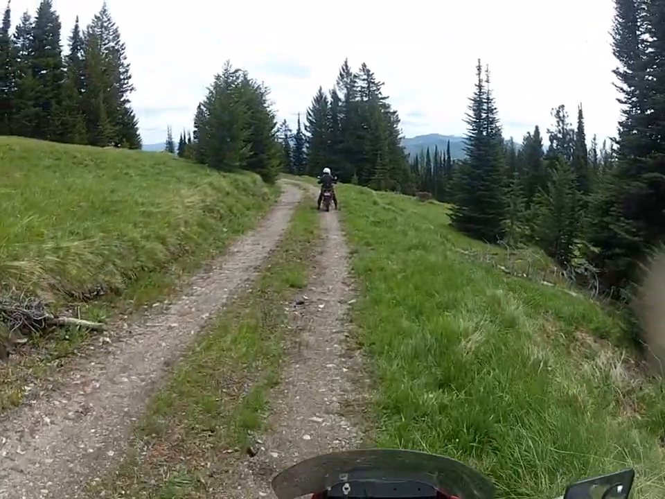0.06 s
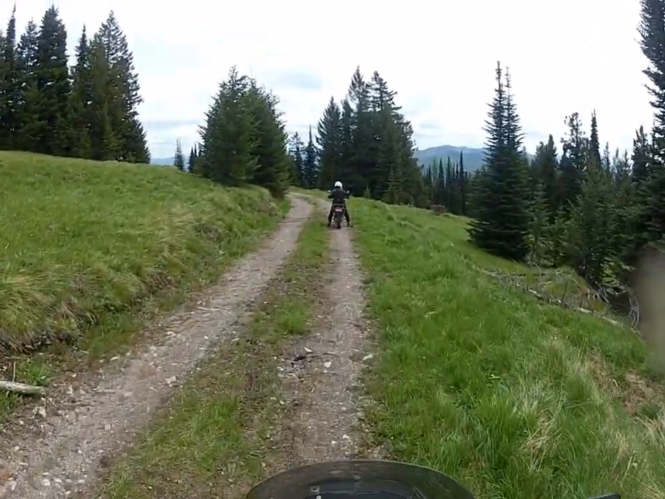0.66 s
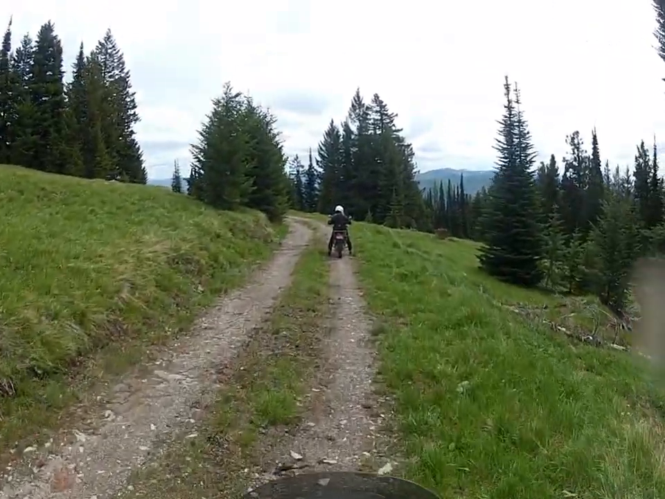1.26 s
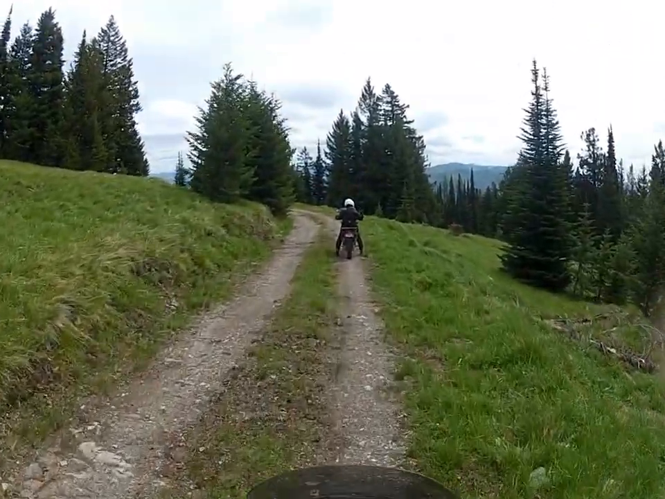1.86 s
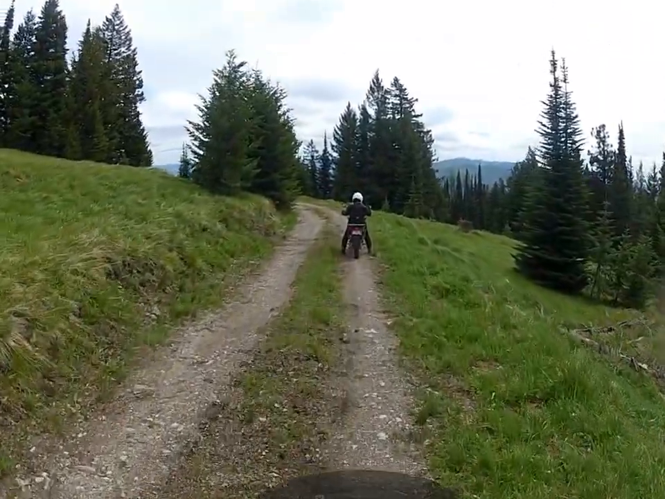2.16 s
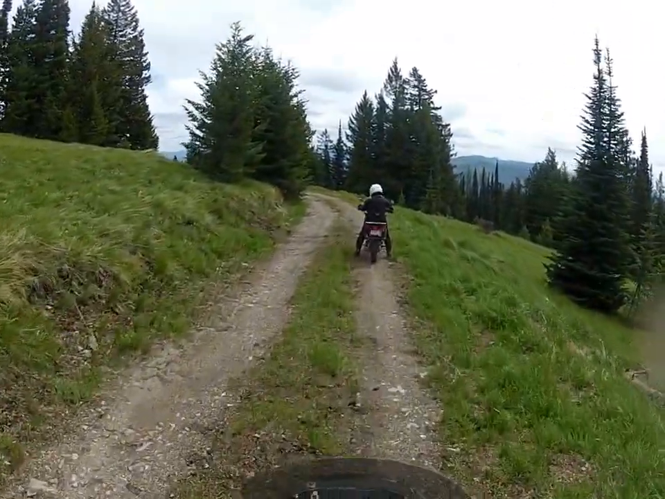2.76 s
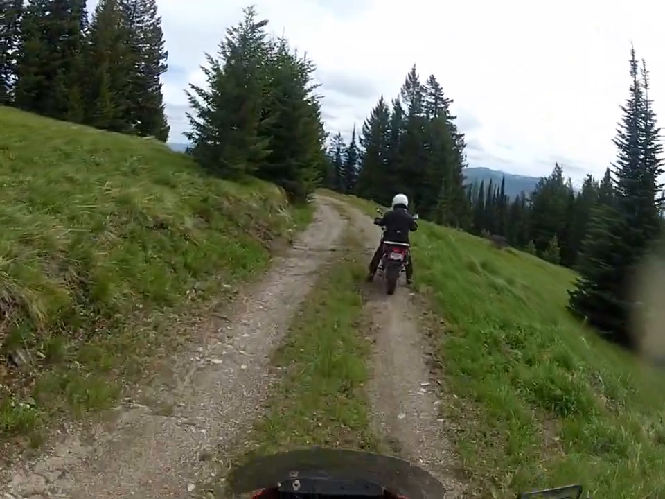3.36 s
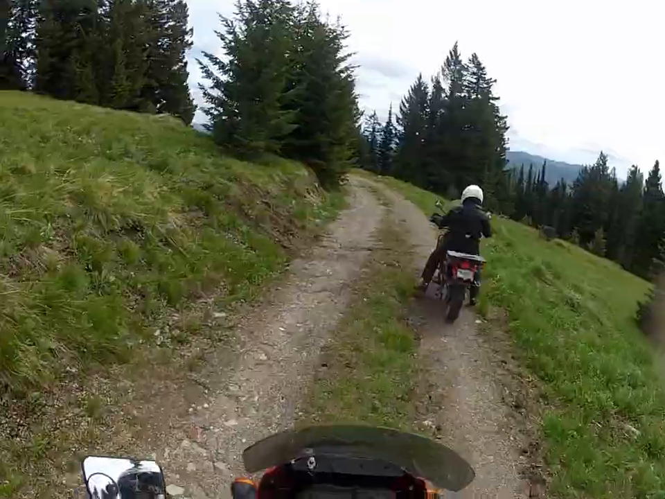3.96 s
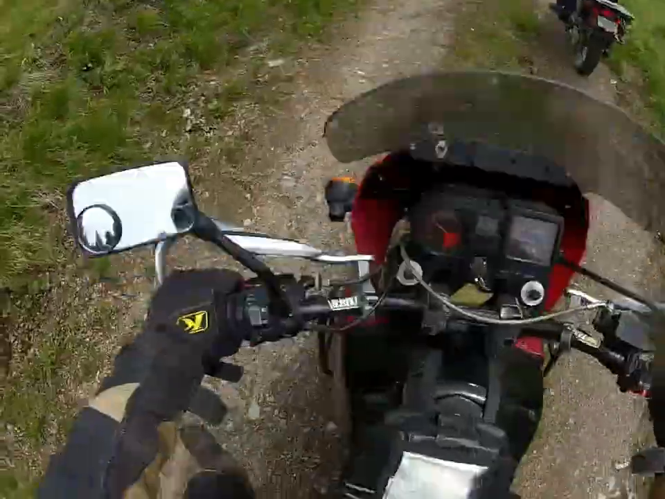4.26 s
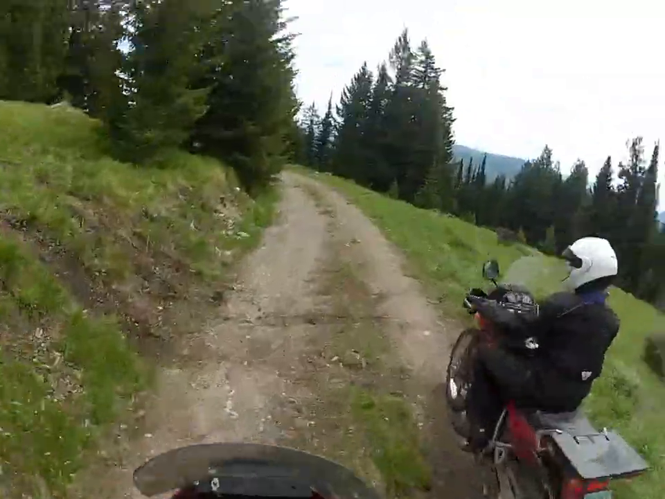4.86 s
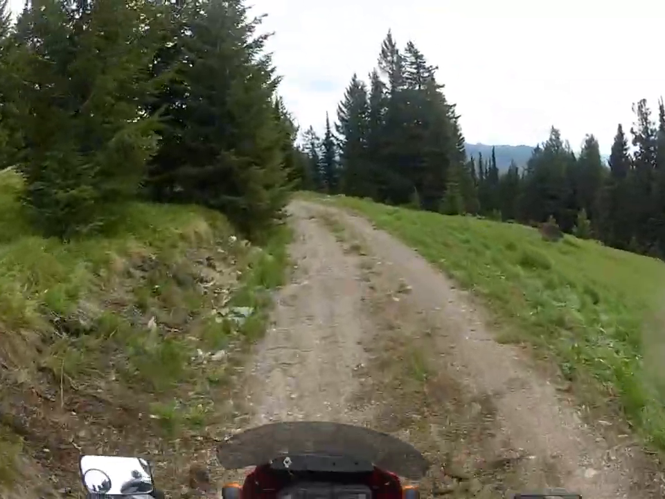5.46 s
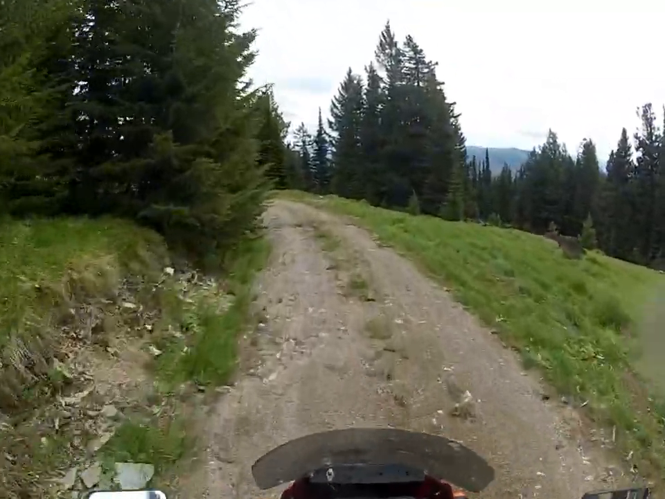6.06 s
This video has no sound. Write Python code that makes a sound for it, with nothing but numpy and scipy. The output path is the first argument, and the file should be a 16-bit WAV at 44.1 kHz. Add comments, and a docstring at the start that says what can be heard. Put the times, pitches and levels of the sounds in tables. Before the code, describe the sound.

A motorcycle thuds along slowly on gravel, with a sharp double knock on the microphone before the engine pulls harder.

```python
"""A gravel forest track, heard from a camera on a motorcyclist's helmet. The single-cylinder bike
rolls at idle, misfires once, then pulls away past a waiting one. Each firing is a low thud over
the engine's clatter; wind rumbles and stones tick under the tyres. As the rider looks down,
something knocks on the camera's shell and snaps back. The camera holds each sample, adding a thin fizz."""
import sys
import numpy as np
from scipy import signal
from scipy.fft import rfft, irfft
from scipy.io import wavfile
from scipy.ndimage import uniform_filter1d

SR = 44100
rng = np.random.default_rng(int(sys.argv[2]) if len(sys.argv) > 2 else 0)


def wav_out(sig):
    """Save sig, one row per channel (or a flat mono array), as 16-bit PCM at SR to the path in sys.argv[1]."""
    wavfile.write(sys.argv[1], SR, np.round(np.clip(np.atleast_2d(sig).T, -1, 1) * 32767).astype(np.int16))


N = 273420
TIME = np.arange(N) / SR

# Engine speed, from idle through a stumble to the pull away: time_s, firing_rate_hz
ENGINE_SPEED = [(0.0, 10.839), (1.14, 10.358), (2.29, 10.622), (2.59, 11.24), (3.14, 11.074),
                (3.42, 13.415), (3.53, 12.48), (4.3, 15.409), (4.81, 19.025), (5.38, 20.613),
                (5.73, 18.958), (6.2, 22.355)]
# Tone of one exhaust thud, throttle shut and wide open: frequency_hz, gain_db
THUD_SHUT_EQ = [(18, -42), (30, -17), (45, 16.5), (62, 13), (83, 20), (100, -9.5), (130, -15), (165, 5.5),
                (235, 9.5), (308, 6), (350, -28.5), (445, -0.5), (520, -24.5), (900, -23)]
THUD_OPEN_EQ = [(18, -28), (45, 0), (78, 9), (116, 19), (150, -4.5), (205, 14), (268, 23.5), (300, 15),
                (328, 2.5), (405, -19), (480, 9.5), (560, -12.5), (900, -23.5)]
# Colour of the clatter, at idle and under load: frequency_hz, gain_db
CLATTER_IDLE_EQ = [(150, -7), (330, 4), (640, 3.5), (800, -5.5), (1100, -3.5), (1500, -8), (2000, -2.5),
                   (2700, -4.5), (3200, -11.5), (3700, -15), (4200, -14.5), (5100, -15), (5900, -15)]
CLATTER_LOAD_EQ = [(150, 2.5), (330, 2), (640, 0), (830, -5.5), (1100, -1), (1600, -2.5), (2200, -0.5),
                   (2850, -3.5), (3200, -10), (3700, -12), (4200, -15.5), (5100, -11.5), (5900, -13)]
# Valve and piston taps over the steady clatter: place_cycles, width_cycles, height_ratio
VALVE_TAPS = [(.19, 0.047, 0.24), (.3, 0.071, 0.48), (.78, 0.034, 0.34)]
# Resonances of the camera's case, rung by the clatter: pitch_hz, width_hz, gain_db
CASE_MODES = [(664, 89, -16), (894, 51, -15.5), (1085, 100, -11.5), (1218, 80, -14.5), (1447, 110, -18.5),
              (1804, 126, -10.5), (2283, 130, -18), (2810, 330, -21), (3610, 280, -15.5),
              (5250, 250, -25.5)]
# A closing valve and two duller case knocks: place_cycles, pitch_hz, level_db, t60_s
CYCLE_PINGS = [(.29, 1850, -56, 0.025), (.31, 451, -55, 0.068), (0.809, 468, -54.5, 0.05)]
# Colour of the wind and chassis rumble: frequency_hz, gain_db
RUMBLE_EQ = [(12, -7), (25, -0.5), (40, -7.5), (75, 1), (110, -1.5), (160, -15.5), (300, -9.5),
             (700, -38.5)]
# Low jolts through the camera mount: start_s, level_db, pitch_hz, t60_s, rise_s
MOUNT_JOLTS = [(.205, -17.5, 55, 0.17, 0.028), (0.889, -24, 43.7, 0.23, .035),
               (1.6, -25, 52.7, 0.09, 0.011), (2.48, -31, 40, 0.16, 0.02), (4.167, -21, 63.7, 0.53, 0.0033),
               (4.345, -11, 87, 0.11, 0.0077), (4.6, -22.5, 133, 0.14, 0.022), (5.69, -27, 40.2, .17, .02)]
# The larger stones: start_s, tick_db, mudguard_ring_db
BIG_STONES = [(.2534, -65, -73), (.4664, -62, -75), (1.0087, -64.5, -73), (2.502, -62, -57),
              (2.8104, -60, -48.5), (3.3614, -62, -70), (3.7285, -57, -68), (3.9443, -60, -47),
              (4.0524, -55.5, -66), (4.7243, -56, -51), (5.6668, -46.5, -45.5)]
# Colour of a stone's tick and of the mudguard's ring: frequency_hz, gain_db
TICK_EQ = [(2500, -27), (4600, -8), (5230, 0), (5800, -13), (7000, -24)]
MUDGUARD_EQ = [(400, -10), (1000, 0), (1700, -2), (2800, 3), (3200, -4), (3650, 4), (4300, -19),
               (6000, -35)]
# Modes of the camera's shell: pitch_hz, gain_db, t60_s
SHELL_MODES = [(196, -6.5, 0.024), (345, 4, 0.013), (636, 3.5, 0.021), (887, -7.5, 0.031),
               (1056, -1.5, 0.024), (1185, -7, 0.022), (1785, 2, 0.018), (2005, -1, 0.019),
               (2367, -2, 0.021), (2660, -22, 0.029), (3350, -9.5, 0.021), (3685, -30, 0.048),
               (5150, -31, 0.011)]
# Heavy blows on the shell: start_s, strength_db, tilt_db_per_octave
SHELL_BLOWS = [(4.1617, -16, -5), (4.1664, -14.5, 4), (4.1682, -22.5, 2)]
# Narrow rings in the clatter: start_s, end_s, pitch_hz, width_hz, level_db
WHIR_SWELLS = [(4.33, 4.79, 1102, 139, -50), (5.148, 5.663, 2220, 120, -56.5)]

IDLE_HZ, FULL_LOAD_HZ = 10.65, 19.63  # firing rates at no load and full load
THUD_LEAD_S, MISFIRE_S = .004, 3.586  # each thud starts just ahead of its cycle; one firing fails


def amp(db):
    """Decibels to gain."""
    return 10 ** (np.asarray(db) / 20)


def unit_rms(x):
    """Scales to rms 1."""
    return x / np.sqrt(np.mean(x ** 2) + 1e-20)


def eq_db(eq, hz):
    """An EQ curve on a log frequency axis, falling 20 dB an octave beyond its ends."""
    points_hz, db = np.transpose(eq)
    octaves, points = np.log2(hz + 1), np.log2(points_hz)
    beyond = abs(octaves - np.clip(octaves, points[0], points[-1]))
    return np.interp(octaves, points, db) - 20 * beyond


def add(mix, start_s, sound):
    """Drops a sound into the mix."""
    part = mix[max(round(start_s * SR), 0):][:len(sound)]
    part += sound[:len(part)]


def noise(eq, size=N):
    """Noise of rms 1, coloured by an EQ curve."""
    gain = amp(eq_db(eq, np.fft.rfftfreq(size, 1 / SR)))
    return unit_rms(irfft(rfft(rng.standard_normal(size)) * gain, size))


def resonate(x, hz, width_hz):
    """A steep resonance: two poles applied twice."""
    b, a = signal.iirpeak(hz, hz / width_hz, SR)
    return signal.lfilter(b, a, signal.lfilter(b, a, x))


def body_ring(spectrum_db):
    """The ring of a passive body with this spectrum: sharp attack, dying tail."""
    log_gain = np.log(amp(np.maximum(spectrum_db, -90)))
    mirrored = np.r_[log_gain, log_gain[-2:0:-1]]
    minimum_phase = np.exp(np.conj(signal.hilbert(mirrored)))
    return irfft(minimum_phase[:len(spectrum_db)])


def firing_rate():
    """Firings per second through the ride."""
    return np.interp(TIME, *np.transpose(ENGINE_SPEED))


def engine_load():
    """Load follows engine speed, from 0 at idle to 1 when pulling hard."""
    return np.clip((firing_rate() - IDLE_HZ) / (FULL_LOAD_HZ - IDLE_HZ), 0, 1)


def fader_db(idle_db, doubling_db, pull_db, nod_db):
    """Rides a layer's level: per doubling of engine speed, per Hz/s of pull, and as the head dips."""
    rate = firing_rate()
    pull = uniform_filter1d(np.maximum(np.gradient(rate, TIME), 0), 8000)
    head_down = np.interp(TIME, [3.77, 4.38, 4.88], [0, 1, 0])
    nod = np.sin(np.pi / 2 * head_down) ** 2
    return idle_db + doubling_db * np.log2(rate / IDLE_HZ) + pull_db * pull + nod_db * nod


def exhaust_thuds(cycles, colour_spread_db=0.74, misfire_db=-14):
    """One thud a cycle; opening the throttle lifts the pipe's upper resonances. One firing fails."""
    out, hz = np.zeros(N), np.fft.rfftfreq(8192, 1 / SR)
    shut_db, throttle = eq_db(THUD_SHUT_EQ, hz), engine_load()
    tuning = (firing_rate() / FULL_LOAD_HZ) ** 0.33  # hotter gas at speed tunes the pipe up
    strength_db = fader_db(idle_db=-1.72, doubling_db=-0.71, pull_db=0.23, nod_db=0.49)
    bands_hz = np.geomspace(40, 900, 12)
    for at in np.flatnonzero(np.diff(np.floor(cycles)) > 0):
        open_db = eq_db(THUD_OPEN_EQ, hz / tuning[at])
        db = shut_db + throttle[at] * (open_db - shut_db) + strength_db[at]
        # no two charges burn alike
        db += colour_spread_db * np.interp(hz, bands_hz, rng.standard_normal(len(bands_hz)))
        failed = abs(at / SR - MISFIRE_S) < 0.02
        add(out, at / SR - THUD_LEAD_S, -body_ring(db + failed * misfire_db))
    return out


def engine_clatter(cycles, lug_hz=13.75, lug_spread_hz=1, grain=0.15, unevenness=0.28):
    """Chain and gears rattle steadily; combustion, valves and piston tap at set points of each cycle."""
    load = engine_load()
    cycle_index = np.floor(cycles).astype(int) + 1

    def tap(place, width):
        force = np.exp(unevenness * rng.standard_normal(cycle_index.max() + 1))[cycle_index]
        offset = (cycles - place + .5) % 1 - .5
        return force * np.exp(-.5 * (offset / width) ** 2)

    valves = (1 - 0.2 * load) * sum(height * tap(place, width) for place, width, height in VALVE_TAPS)
    # combustion knocks hardest while the engine lugs at low speed
    lugging = np.exp(-((firing_rate() - lug_hz) / lug_spread_hz) ** 2)
    fired = np.round(cycles) != np.round(np.interp(MISFIRE_S, TIME, cycles))
    combustion = fired * (0.51 + 0.57 * lugging) * tap(place=0.03, width=0.054)
    # single contacts, each about a millisecond long, give the rattle its grit
    contacts = np.exp(grain * unit_rms(uniform_filter1d(rng.standard_normal(N), size=60)))
    drive = unit_rms((1 + valves + combustion) * contacts)
    rattle = drive * (np.sqrt(1 - load) * noise(CLATTER_IDLE_EQ) + np.sqrt(load) * noise(CLATTER_LOAD_EQ))
    case_ring = sum(amp(db) * unit_rms(resonate(drive * rng.standard_normal(N), hz, width_hz))
                    for hz, width_hz, db in CASE_MODES)
    level_db = fader_db(idle_db=-59, doubling_db=12.5, pull_db=0.0362, nod_db=2)
    return amp(level_db) * (rattle + case_ring)


def engine_pings(cycles):
    """Valve and case ring at the same points of every cycle."""
    out, t = np.zeros(N), TIME[:SR // 10]
    for place, hz, db, t60 in CYCLE_PINGS:
        ping = amp(db - 60 * t / t60) * np.sin(2 * np.pi * hz * t)
        for at in np.flatnonzero(np.diff(np.floor(cycles - place)) > 0):
            add(out, at / SR, ping)
    return out


def ride_rumble():
    """A bed of wind and chassis rumble that grows with speed, and jolts that rock the camera mount."""
    out = amp(fader_db(idle_db=-51, doubling_db=6.5, pull_db=0.23, nod_db=8)) * noise(RUMBLE_EQ)
    t = TIME[:SR // 2]
    for start_s, db, hz, t60, rise_s in MOUNT_JOLTS:
        attack = 1 - np.exp(-(t / rise_s) ** 2)
        add(out, start_s, amp(db - 60 * t / t60) * attack * np.sin(2 * np.pi * hz * t))
    return out


def gravel(stones_per_s=5.5, count=40, tick_t60_s=0.075, ring_t60_s=0.088):
    """Stones tick under the tyres and ring the mudguard, a few large among a scatter of small ones."""
    out, t = np.zeros(N), TIME[:4096]
    starts_s = np.cumsum(rng.exponential(1, count)) / stones_per_s
    levels_db = rng.normal([-76, -70], 1.5, (count, 2))  # tick, ring
    small_stones = np.column_stack([starts_s, levels_db])
    for start_s, tick_db, ring_db in np.vstack([BIG_STONES, small_stones]):
        tick = amp(tick_db - 60 * t / tick_t60_s) * noise(TICK_EQ, len(t))
        ring = amp(ring_db - 60 * t / ring_t60_s) * noise(MUDGUARD_EQ, len(t))
        add(out, start_s, tick + ring)
    return out


def shell_hit(strength_db, tilt_db, buzz_db=-9, buzz_t60_s=0.029):
    """One hit rings the loose shell and makes it buzz; a harder contact favours the high modes."""
    t = TIME[:SR // 10]
    ring = sum(amp(db + tilt_db * np.log2(hz / 1000) - 60 * t / t60) * np.sin(2 * np.pi * hz * t)
               for hz, db, t60 in SHELL_MODES)
    buzz = amp(buzz_db - 60 * t / buzz_t60_s) * noise(CLATTER_LOAD_EQ, len(t))
    return amp(strength_db) * (buzz - ring)


def shell_knocks(contact_hz=3900, snap_s=4.3425, slips_per_s=1287):
    """A heavy knock on the camera's shell, then a bright snap made of quick slips."""
    heavy, snap = np.zeros(N), np.zeros(N)
    for start_s, strength_db, tilt_db in SHELL_BLOWS:
        add(heavy, start_s, shell_hit(strength_db, tilt_db))
    for slip, force in enumerate(np.linspace(.5, 1, 6)):
        add(snap, snap_s + slip / slips_per_s, force * shell_hit(strength_db=-20.5, tilt_db=5.4))
    # the heavy blows stay in contact too long to excite the treble
    return signal.sosfilt(signal.butter(5, contact_hz, fs=SR, output="sos"), heavy) + snap


def engine_whirs():
    """Narrow rings swell out of the clatter and fade."""
    out = np.zeros(N)
    for start_s, end_s, hz, width_hz, db in WHIR_SWELLS:
        size = round((end_s - start_s) * SR)
        ring = unit_rms(resonate(rng.standard_normal(size), hz, width_hz))
        add(out, start_s, amp(db) * ring * signal.windows.tukey(size, .5))
    return out


def waiting_bike(pass_s=5.65, gap_m=1.65, ride_m_per_s=5.8, alongside_db=-53):
    """The clatter of a motorcycle idling beside the track swells and fades as the rider passes."""
    distance_m = np.hypot(gap_m, ride_m_per_s * (TIME - pass_s))
    return amp(alongside_db) * gap_m / distance_m * noise(CLATTER_LOAD_EQ)


def scene(knock_pan_db=0.25):
    """The ride sits dead centre; the knocks lean a touch to the right."""
    cycles = np.cumsum(firing_rate()) / SR - .134  # opens just short of a firing
    thud_cycles = cycles + THUD_LEAD_S * firing_rate()  # counted from each thud's attack
    engine = exhaust_thuds(cycles) + engine_clatter(thud_cycles) + engine_pings(thud_cycles)
    ride = engine + ride_rumble() + gravel() + engine_whirs() + waiting_bike()
    return ride + shell_knocks() * amp([[-knock_pan_db], [knock_pan_db]])


def record(dry, top_hz=15300):
    """The camera samples at 12 kHz, clips at full scale and holds each value, mirroring a fizz upward."""
    anti_alias = signal.firwin(4001, 5850, fs=40 * SR)
    sampled = signal.resample_poly(dry, 40, 147, axis=1, window=anti_alias)
    held = np.repeat(np.clip(sampled, -1, 1), 4, axis=1)  # stair steps at 48 kHz
    fizzy = signal.resample_poly(held, 147, 160, axis=1)[:, :N]
    high_cut = signal.firwin(511, top_hz, window=("kaiser", 9), fs=SR)
    return signal.oaconvolve(fizzy, high_cut[None], "same", axes=1)


dry = scene()
out = record(dry)
wav_out(out)
```